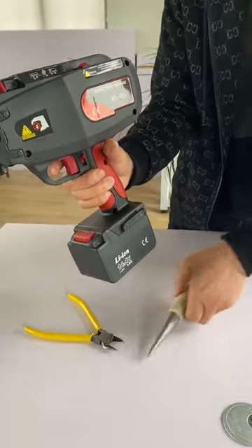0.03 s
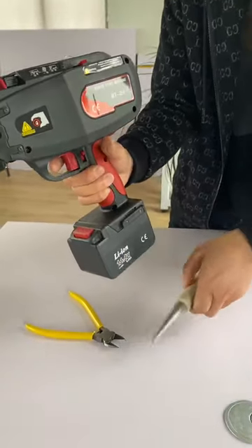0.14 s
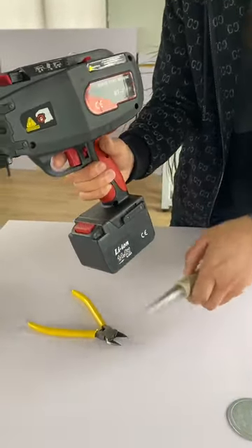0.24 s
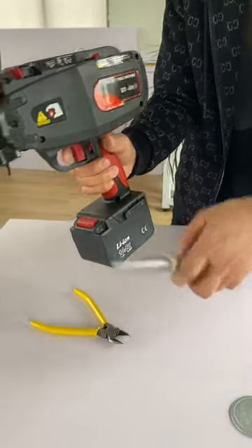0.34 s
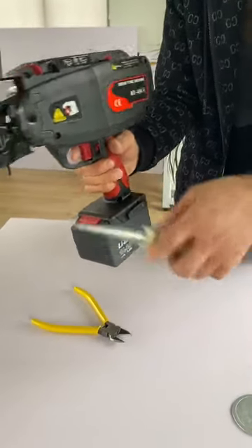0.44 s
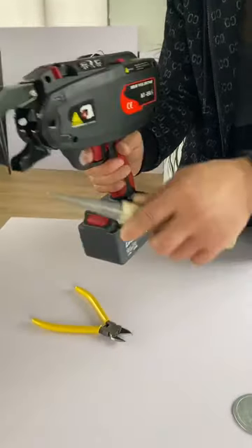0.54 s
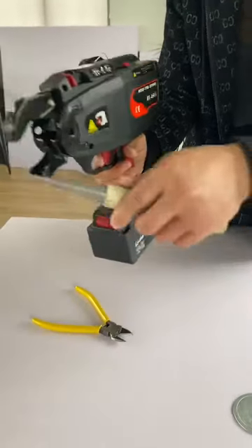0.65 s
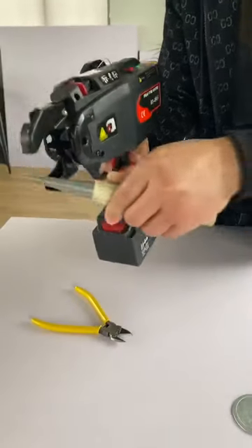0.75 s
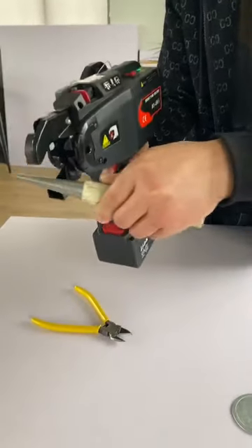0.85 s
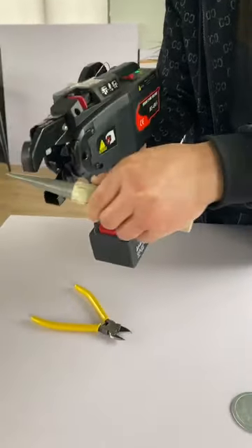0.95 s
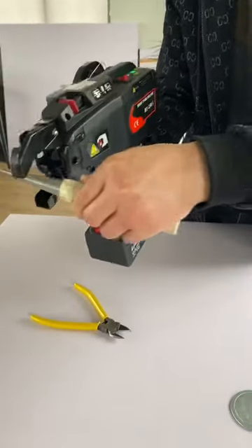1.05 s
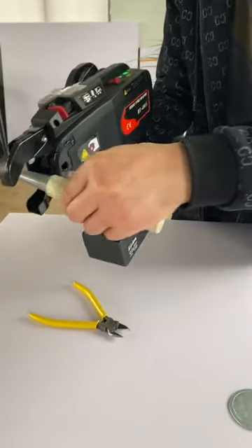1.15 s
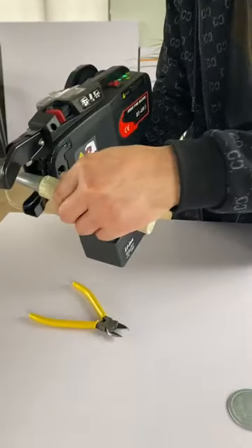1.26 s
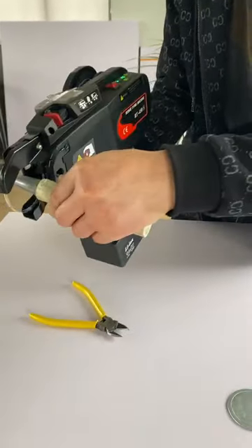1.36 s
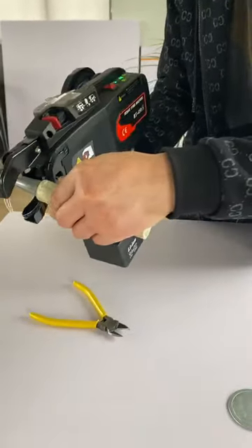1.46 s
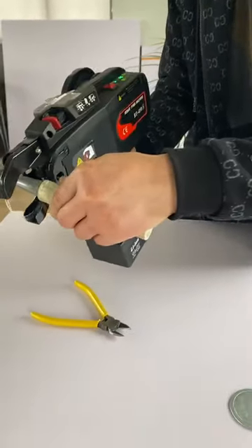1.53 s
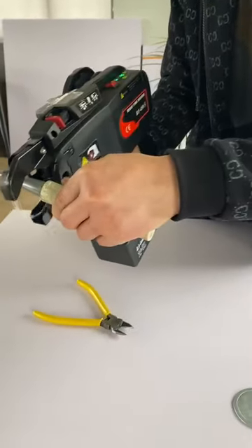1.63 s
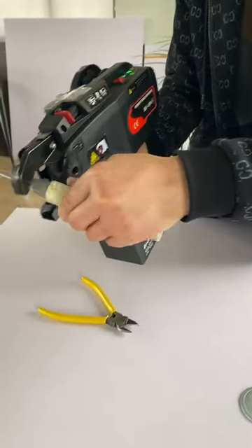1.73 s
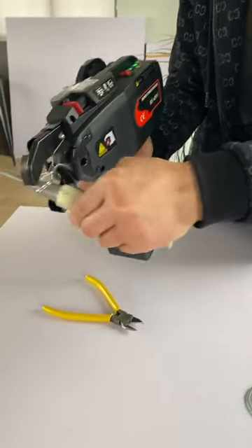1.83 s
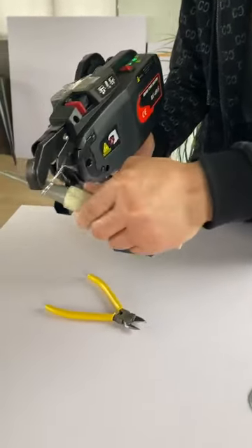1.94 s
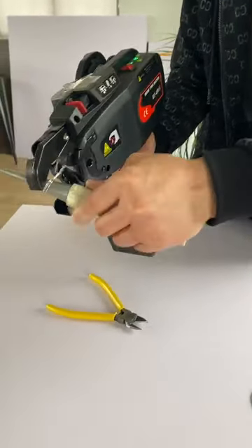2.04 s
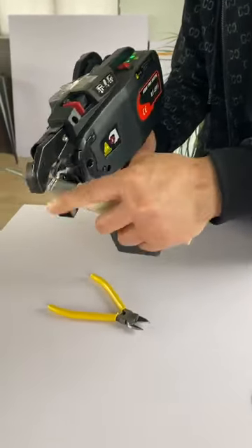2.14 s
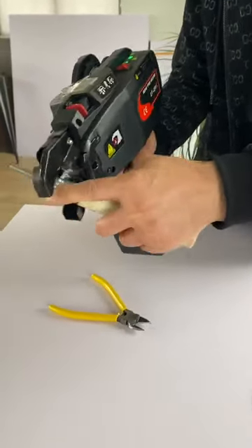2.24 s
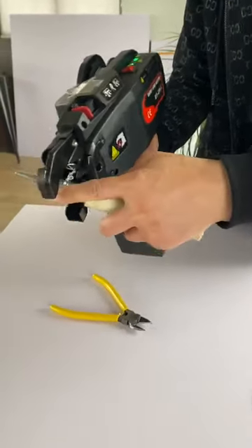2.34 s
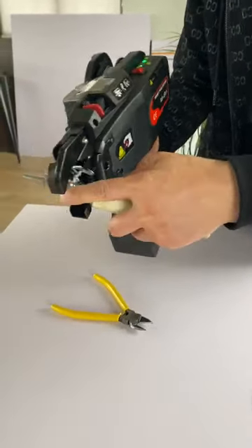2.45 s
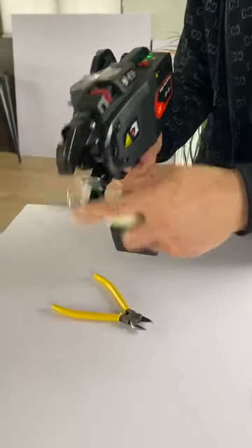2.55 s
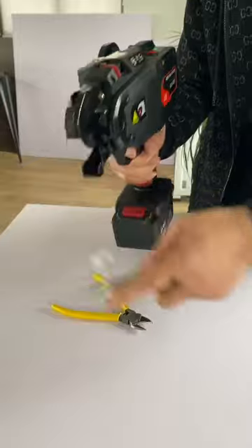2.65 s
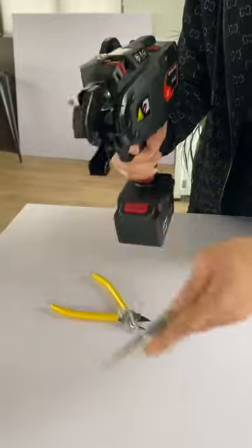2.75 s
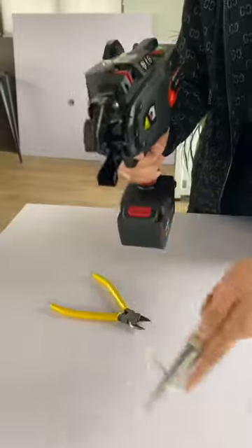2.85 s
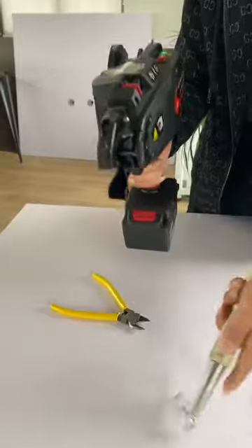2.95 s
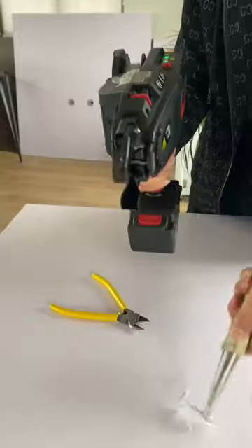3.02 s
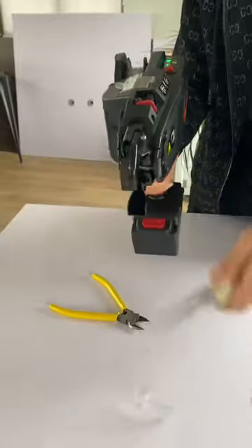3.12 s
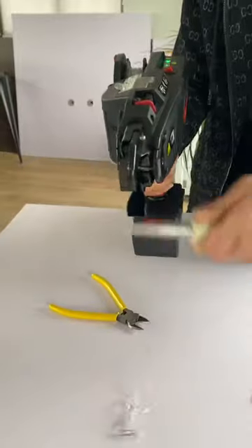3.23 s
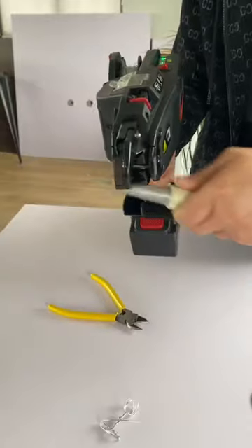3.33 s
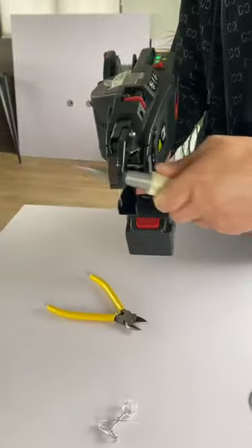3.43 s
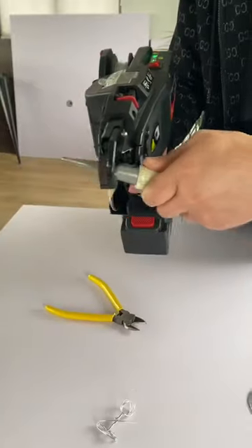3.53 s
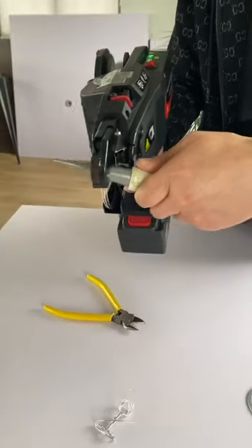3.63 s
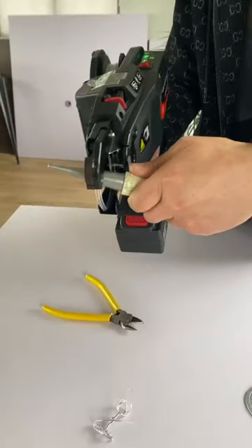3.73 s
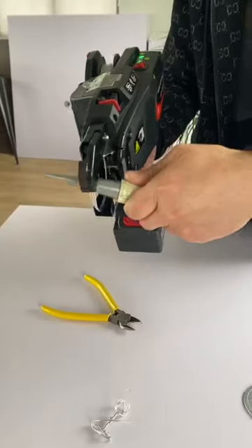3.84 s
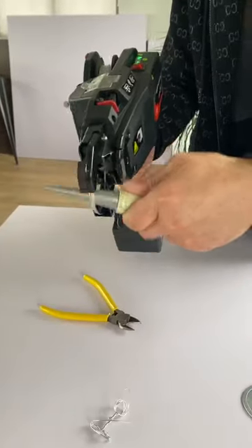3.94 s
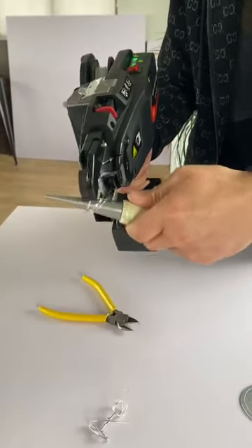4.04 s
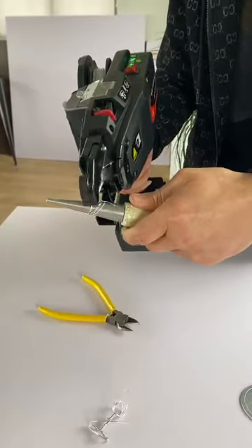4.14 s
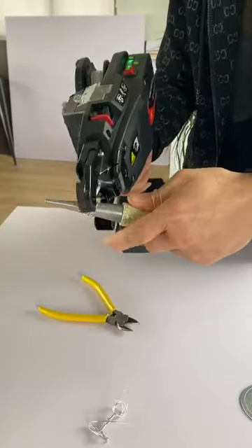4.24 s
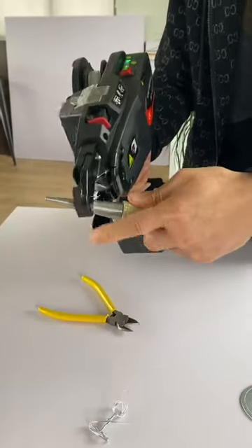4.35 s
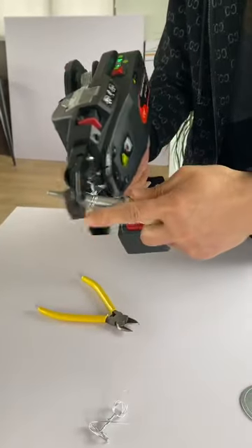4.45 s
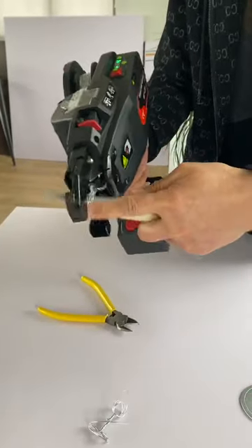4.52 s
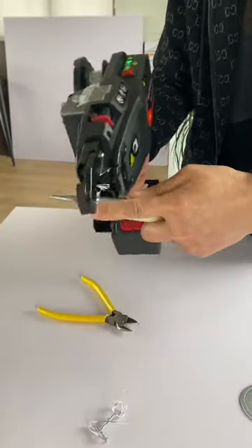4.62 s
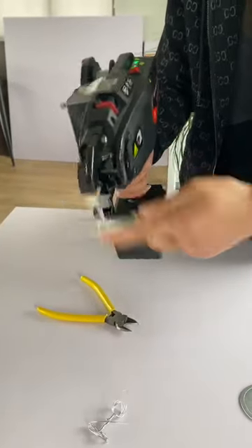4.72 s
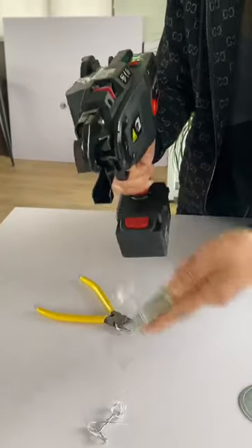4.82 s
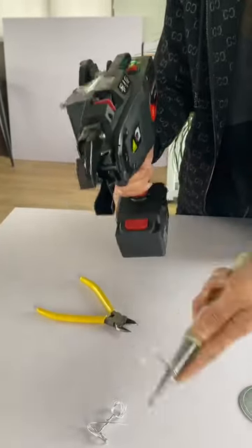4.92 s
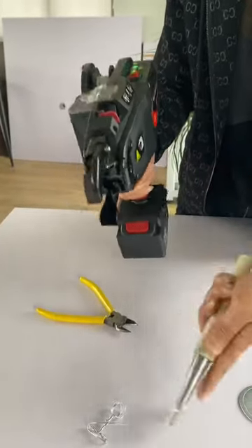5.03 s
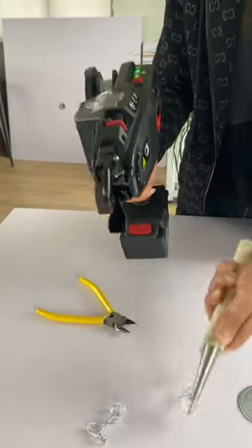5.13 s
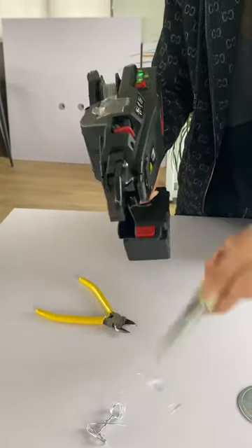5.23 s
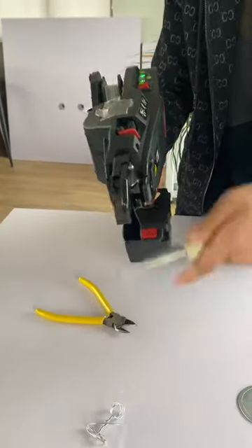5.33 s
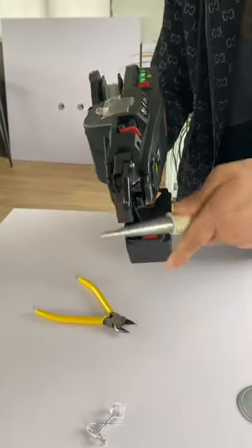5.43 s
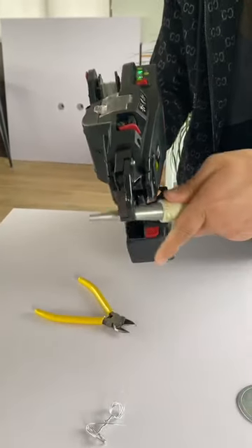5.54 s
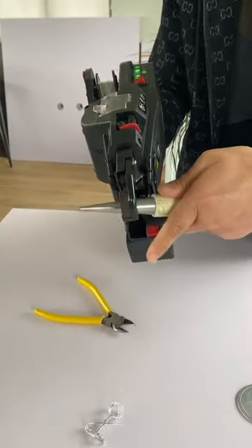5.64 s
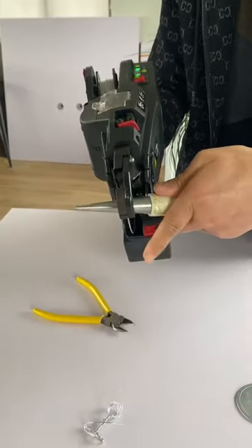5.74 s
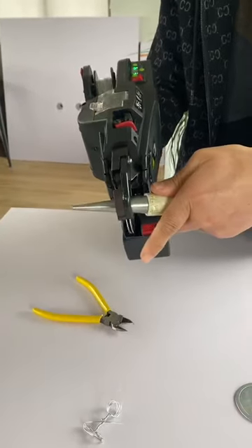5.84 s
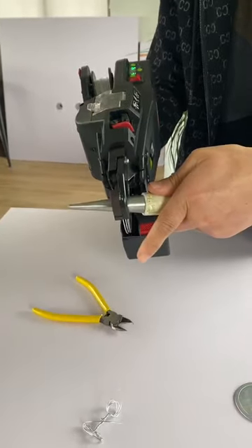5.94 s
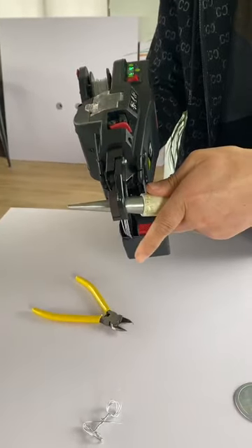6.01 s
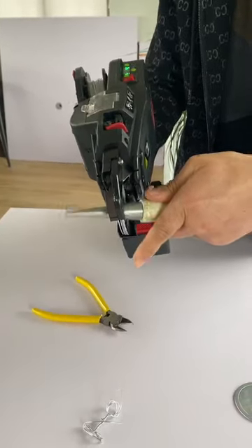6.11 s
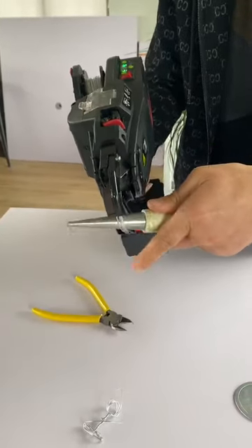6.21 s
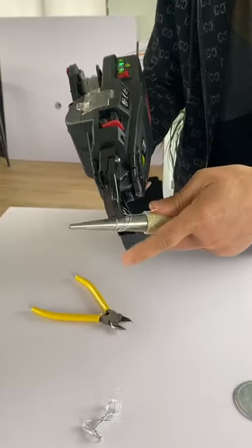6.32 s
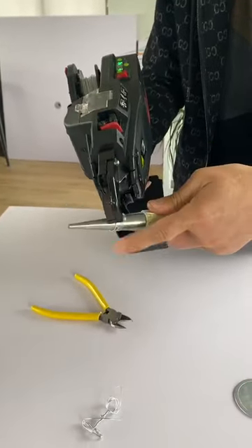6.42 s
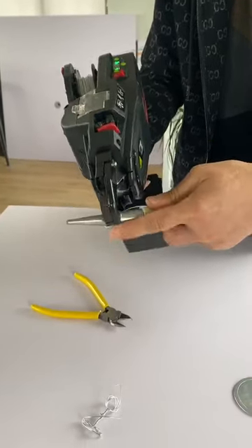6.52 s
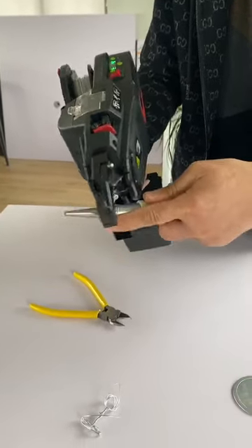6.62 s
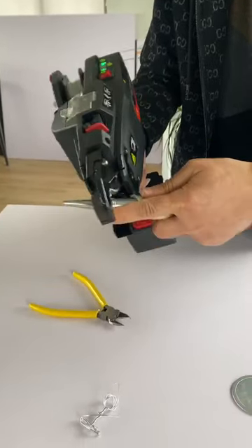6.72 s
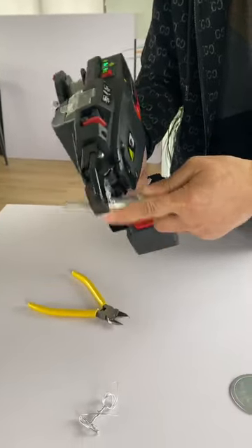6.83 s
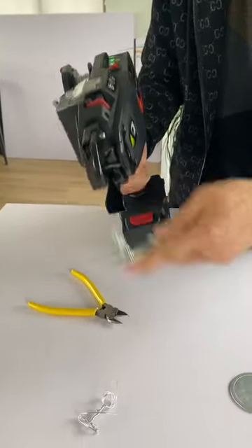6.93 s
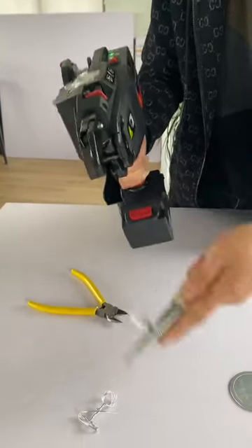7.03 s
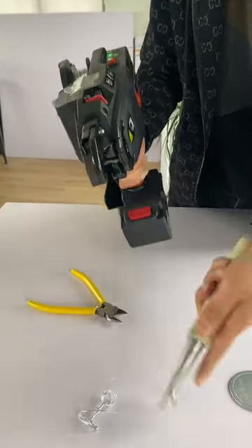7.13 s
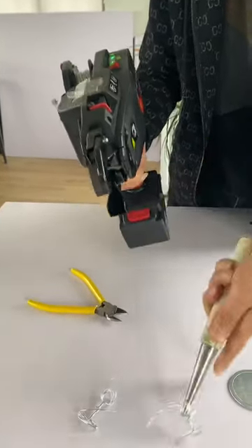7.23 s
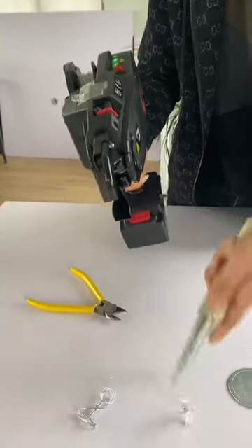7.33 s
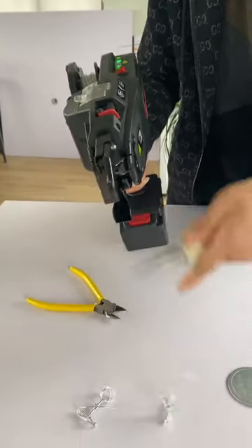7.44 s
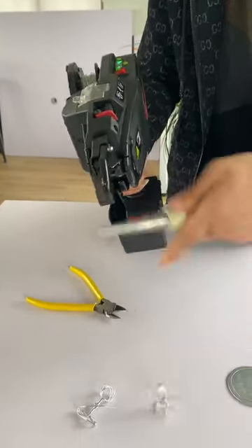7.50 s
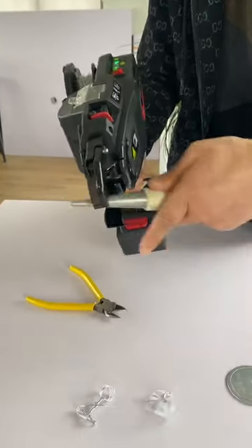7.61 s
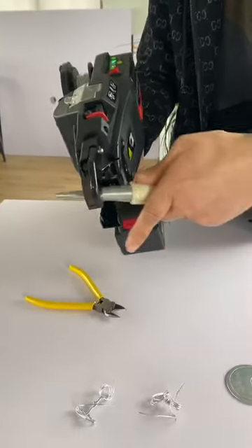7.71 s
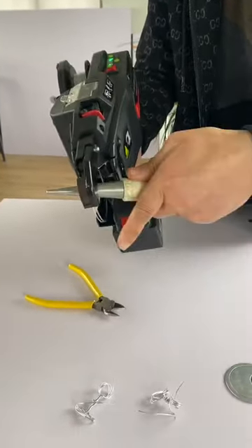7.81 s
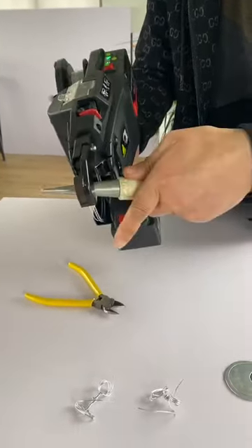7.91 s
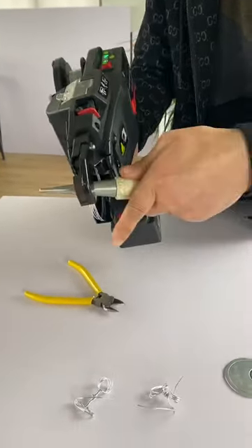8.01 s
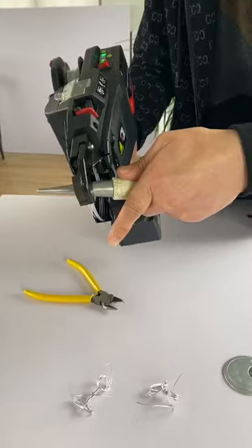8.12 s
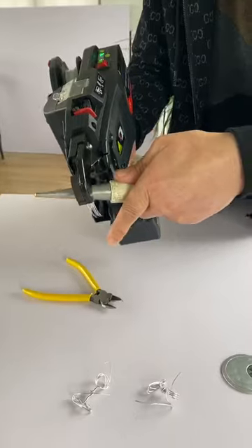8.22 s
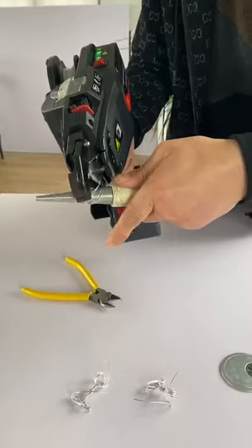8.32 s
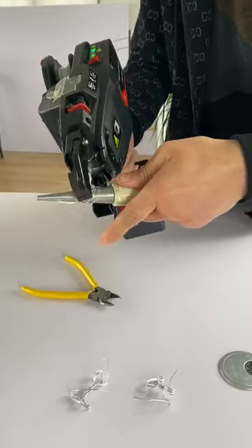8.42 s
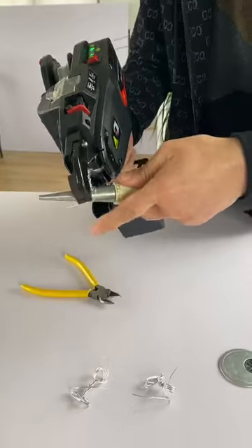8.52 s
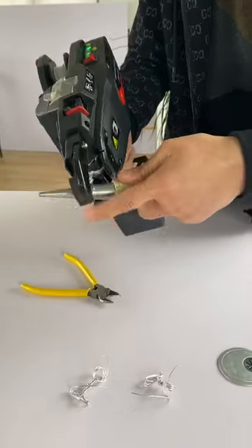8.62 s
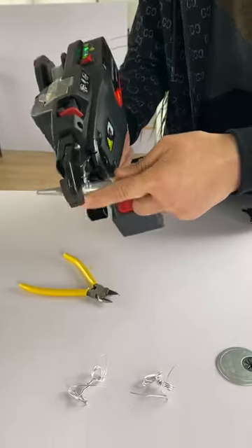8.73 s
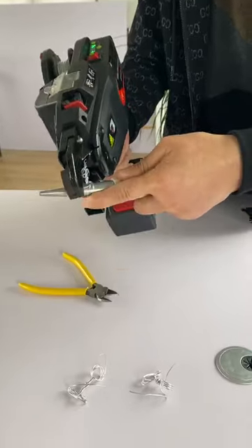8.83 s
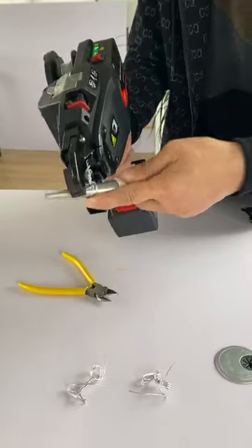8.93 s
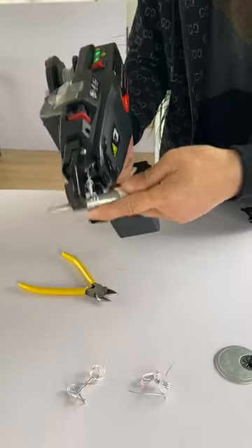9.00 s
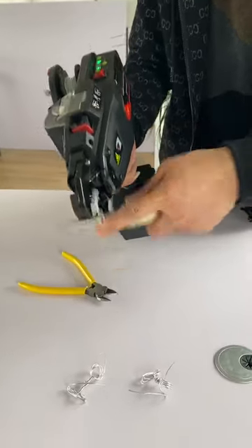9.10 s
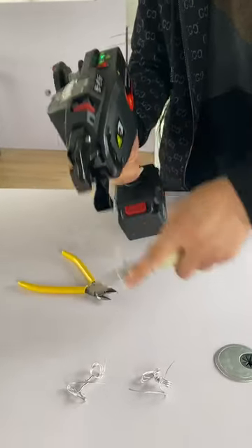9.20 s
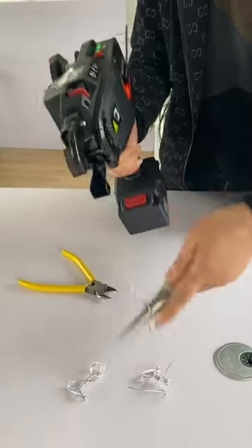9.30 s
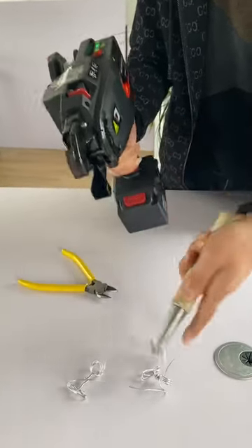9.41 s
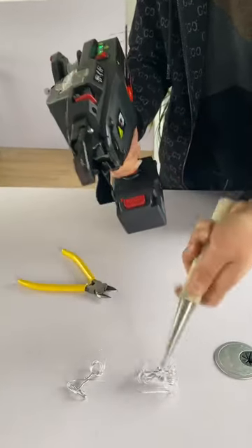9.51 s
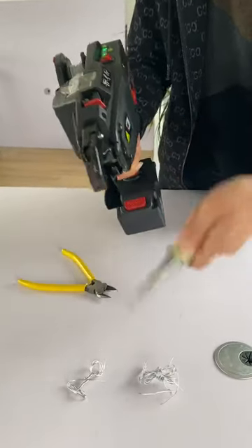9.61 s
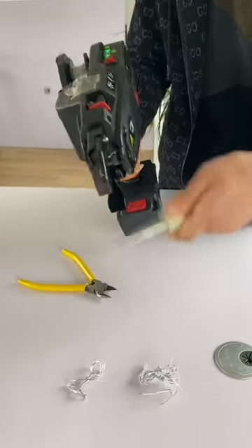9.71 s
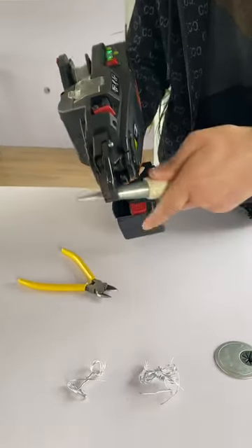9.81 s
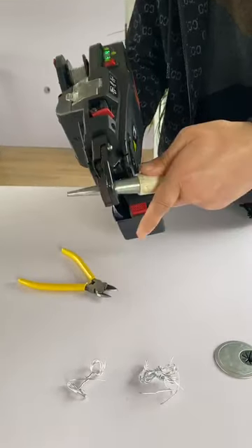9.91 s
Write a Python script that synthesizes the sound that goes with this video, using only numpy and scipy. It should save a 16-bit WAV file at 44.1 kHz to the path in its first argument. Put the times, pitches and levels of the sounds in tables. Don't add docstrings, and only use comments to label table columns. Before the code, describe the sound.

In a bare, echoing workshop, faint scrapes and ticks of steel lead into a battery wire-tying tool. Each cycle rattles as wire feeds, snaps hard at the cutter, clunks at the clutch, then whines and sags while twisting before a softer rewind and clicks. Between cycles, spike and wire knots chink on the table. Four complete ties, then a fifth is cut short. Close phone microphone.

```python
import sys
import numpy as np
from scipy import signal
from scipy.fft import rfft, irfft, next_fast_len
from scipy.io import wavfile
from scipy.ndimage import uniform_filter1d

SR = 44100
rng = np.random.default_rng(int(sys.argv[2]) if len(sys.argv) > 2 else 0)


def volts(x):
    e = np.asarray(x, float) / 20
    return 10 ** e


def transcribe(signal):
    frames = np.atleast_2d(signal).T
    limited = np.clip(frames, -1, 1)
    pcm = np.round(limited * 32767).astype(np.int16)
    wavfile.write(sys.argv[1], SR, pcm)


N = 439236

# (frequency [Hz], density [dB per Hz])
TREBLE = [(4530, -25.5), (7700, -13), (9220, -1), (10500, -1), (11100, -3), (13000, -11)]
# (frequency [Hz], density [dB per Hz])
TWIST_COLOUR = [(150, -61.5), (250, -40.5), (291, -35), (513, -21), (600, -23.5), (705, -13), (810, -15.5),
                (1080, -15.5), (1330, -10.5), (1620, -11.5), (1830, -4.5), (2160, -6), (2450, -4.5),
                (3310, -12), (3970, -12), (5600, -12), (6800, -28), (8840, -62.5), (15000, -120)]


def evened(x):
    return x / np.sqrt(np.mean(x ** 2) + 1e-20)


def read(points, hz):
    f, value = np.transpose(points)
    return np.interp(np.log(hz + 1), np.log(f + 1), value)


def add(mix, s, sound):
    part = mix[round(s * SR):][:len(sound)]
    part += sound[:len(part)]


def coloured(x, points):
    size = next_fast_len(len(x))
    hz = np.fft.rfftfreq(size, 1 / SR)
    inside = (hz > points[0][0]) & (hz < points[-1][0])
    spectrum = rfft(x, size) * volts(read(points, hz)) * inside
    return evened(irfft(spectrum, size)[:len(x)])


def drift(size, hz):
    fast_size = next_fast_len(size)
    low_pass = 1 / (1 + (np.fft.rfftfreq(fast_size, 1 / SR) / hz) ** 4)
    spectrum = rfft(rng.standard_normal(fast_size)) * low_pass
    return evened(irfft(spectrum, fast_size)[:size])


def unpack(rows):
    s, *columns = np.transpose(rows)
    t = np.arange(s[0], s[-1], 1 / SR)
    return [t] + [np.interp(t, s, c) for c in columns]


def rattle(size, spread_db):
    return rng.standard_normal(size) * volts(spread_db * drift(size, 450))


def air():
    # (time [s], rumble level [dB])
    air_levels = [(0.0, -40.5), (0.8, -43.5), (1.36, -39.5), (2.02, -49.5), (2.91, -52.5), (3.16, -46),
                  (3.85, -45.5), (4.6, -51.5), (6.29, -45), (6.82, -52), (7.4, -50), (8.1, -47.5),
                  (8.51, -51), (9.96, -48.5)]
    # (frequency [Hz], density [dB per Hz])
    rumble_colour = [(12, -44), (20, -16.5), (34, -8), (48, 8.5), (75, -2), (102, 4.5), (118, -5),
                     (150, 3.5), (178, -7), (226, -5.5), (300, -27), (390, -56.5), (660, -120)]
    # (frequency [Hz], density [dB per Hz])
    hush_colour = [(150, -22), (250, -6.5), (453, -9.5), (600, -8.5), (652, -9.5), (2840, -26),
                   (7170, -43.5), (10700, -45.5), (13000, -67)]
    # (start [s], end [s], frequency [Hz], level [dB])
    squeak = (.48, .7, 600, -52)
    t, rumble_db = (np.resize(c, N) for c in unpack(air_levels))
    hush_db = -57.5 + 0.84 * (rumble_db + 49.5)
    out = volts(rumble_db + 2.7 * drift(N, 4.2)) * coloured(rng.standard_normal(N), rumble_colour)
    out += volts(hush_db + drift(N, 7.8)) * coloured(rng.standard_normal(N), hush_colour)
    start, end, hz, db = squeak
    t = np.arange(0, end - start, 1 / SR)
    add(out, start, volts(db) * np.sin(2 * np.pi * hz * t) * np.hanning(len(t)))
    return out


def scrape(start, end, db, hz, width, uneven_db=4.5):
    size = round((end - start) * SR)
    slips = rattle(size, uneven_db) * np.linspace(1, .4, size) * signal.windows.tukey(size, .2)
    resonance = [(max(hz - 2 * width, 300), -20), (hz - width / 2, -3), (hz, 0),
                 (hz + width / 2, -3), (hz + 2 * width, -20)]
    return start, volts(db) * coloured(slips, resonance)


def tick(s, peak_db, treble_db, hz, thud_db=-99):
    t = np.arange(2500) / SR
    crack_colour = [(500, -22), (.75 * hz, -11), (hz, 0), (1.25 * hz, -10), (9000, -20), (14000, -30)]
    crack = coloured(rng.standard_normal(len(t)), crack_colour)
    spit = coloured(rng.standard_normal(len(t)), [(6500, -18.5), (10000, 7.5), (12600, 4.5), (14300, -7.0)])
    thud = coloured(rng.standard_normal(len(t)), [(180, -2.0), (350, -1.0), (900, -6.5)])
    snap = volts(peak_db - 6.5) * crack * np.exp(-t / 0.0046)
    snap += volts(treble_db) * spit * np.exp(-t / 0.0028)
    snap += volts(thud_db) * thud * np.exp(-t / 0.013)
    return s - .0015, snap * (1 - np.exp(-(t / 0.0011) ** 2))


def table_top():
    # (start [s], end [s], level [dB], centre [Hz], width [Hz])
    scrapes = [(0, 0.001, -40.5, 5800, 8000), (0, 0.088, -45.5, 583, 284), (0.759, 0.778, -31, 2320, 2520),
               (0.775, 0.973, -59, 3730, 393), (2.995, 3.12, -66, 3480, 900),
               (5.048, 5.08, -55.5, 3120, 3020), (5.056, 5.077, -59, 12000, 2500),
               (5.076, 5.2, -79, 11640, 2500), (5.199, 5.24, -69.5, 11640, 1500),
               (7.381, 7.604, -67, 1295, 480), (9.13, 9.167, -51, 3280, 250),
               (9.147, 9.175, -56, 6270, 200), (9.115, 9.177, -50, 11560, 2200),
               (9.456, 9.463, -40, 1500, 1510), (9.111, 9.175, -52, 5100, 400)]
    # (time [s], peak [dB], treble [dB], centre [Hz])
    ticks = [(0.2732, -42, -66, 2980), (0.7623, -27.5, -23, 2010), (1.1381, -37.5, -50, 1740),
             (2.9256, -23.5, -42.5, 3400), (2.992, -33, -47, 1990), (3.03, -36.5, -44.5, 4060),
             (3.1772, -34, -42.5, 2080), (3.1888, -32, -43, 5500), (3.24, -29.5, -41, 5000),
             (3.371, -46.5, -51.5, 2150), (5.0453, -46, -44.5, 1960), (5.149, -43, -65, 1800),
             (5.3828, -27, -39.5, 5800), (5.4398, -26, -36, 5230), (5.459, -30, -56.5, 3060),
             (5.4996, -40, -39.5, 3410), (5.534, -33.5, -59, 3830), (5.559, -36, -44, 5330),
             (5.586, -35.5, -48, 5140), (5.6243, -35.5, -52, 5440), (7.172, -29, -30.5, 1710),
             (7.2023, -28.5, -36.5, 3650), (7.3488, -38, -47.5, 5040), (7.5034, -44.5, -61, 1620),
             (7.6317, -30.5, -39, 1820), (7.684, -38.5, -50, 2430), (9.1402, -35, -33, 5060),
             (9.166, -29, -42, 3310), (9.456, -27.5, -33.5, 4580), (9.485, -33, -50, 3460)]
    # (time [s], level [dB])
    chinks = [(2.92, -41), (2.935, -55), (2.9742, -46.5), (3.017, -53), (3.037, -50.5), (3.258, -44.5),
              (3.277, -49.5), (5.396, -49.5), (5.591, -45.5), (5.611, -48.5), (5.638, -50), (9.129, -45),
              (9.157, -44), (9.21, -50), (9.5, -52), (9.527, -52)]
    # (start [s], end [s], level [dB], centre [Hz], width [Hz])
    rustles = [
        (2.928, 3.1, -60.5, 3500, 4000),
        (3.171, 3.376, -59, 4000, 4500),
        (5.386, 5.653, -58, 4470, 5000),
        (5.384, 5.65, -64.5, 11500, 2500),
        (7.175, 7.295, -57, 5000, 5000),
        (9.36, 9.45, -75, 10000, 4000),
        (9.47, 9.577, -61.5, 10500, 4000),
    ]
    table = np.zeros(N)
    for row in scrapes:
        add(table, *scrape(*row))
    for s, peak_db, treble_db, hz in ticks:
        add(table, *tick(s, peak_db, treble_db, hz, thud_db=peak_db - 17.5))
    for s, db in chinks:
        add(table, *tick(s, db + 1.5, db, 5800))
    for row in rustles:
        add(table, *scrape(*row, uneven_db=8.))
    return table


def shell(x):
    # (frequency [Hz], width [Hz], gain [dB])
    shell_modes = [(920, 180, 4), (1400, 290, 2), (1850, 57, -1), (2260, 74, -3.5), (2820, 64, -1),
                   (3310, 180, -2.5), (3960, 270, -1), (4320, 210, -2), (5100, 310, 4), (5750, 200, 2)]
    hz, t, z = signal.stft(x, SR, nperseg=1024)
    patches = uniform_filter1d(rng.standard_normal(z.shape), size=4, axis=0)
    patches = evened(uniform_filter1d(patches, size=6, axis=1))
    modes_db = sum(db / (1 + (2 * (hz - f) / w) ** 2) for f, w, db in shell_modes)
    z = z * volts(modes_db[:, None] + 3.5 * patches)
    return evened(np.resize(signal.istft(z, SR, nperseg=1024)[1], len(x)))


def feed(start, closed, db, change_db):
    # (frequency [Hz], density [dB per Hz])
    feed_colour = [(150, -66), (250, -31), (441, -15), (565, -30), (640, -17.5), (917, -11), (1140, -13.5),
                   (1330, -4), (1510, -11), (1830, -8), (2580, -9.5), (2890, -11.5), (3270, -13),
                   (5230, -15), (6800, -27.5), (8840, -56.5), (15000, -120)]
    orders = [14, 20, 27, 28, 29, 39, 40, 42, 46, 60, 84]
    order_levels = [-15, -4, -14, 0, -9, -11, -3, -12, -12, -10, -12]
    shaft_hz, spin_up_s = 46.65, 0.022
    t, body_db = unpack([(start, db - 8.5), (start + spin_up_s, db), (closed, db + change_db)])
    speed = 1 + .035 * np.exp(-(t - t[0]) / .07) + .0008 * drift(len(t), 30)
    turns = np.cumsum(shaft_hz * speed) / SR
    tones = np.zeros(len(t))
    for order, level in zip(orders, order_levels):
        waver = volts(level + 2.2 * drift(len(t), 25))
        tones += waver * np.sin(2 * np.pi * (order * turns + rng.random()))
    knocks = rattle(len(t), 1.0)
    noise = shell(coloured(knocks, feed_colour)) + volts(-11.5) * coloured(knocks, TREBLE)
    return t[0], volts(body_db) * (noise + volts(-3.5) * evened(tones)) * signal.windows.tukey(len(t), .02)


def blow(s, length, peak_db=-99, thump_db=-99, knock_db=-99, treble_db=-99):
    # (frequency [Hz], level [dB], free t60 [s])
    housing = [(437, -10, 0.12), (1110, 8, 0.037), (1470, -8, 0.1), (2344, 0.5, 0.11), (4000, -21.5, 0.095),
               (5196, -15, 0.36), (5300, -32, 0.068), (5430, -42.5, 0.065)]
    t = np.arange(4000) / SR
    shape = (t / length * np.exp(1 - t / length)) ** 2 * volts(3 * drift(len(t), 150))
    shape /= shape.max()
    rings = []
    for hz, db, t60 in housing:
        held_t60 = min(.2 * t60, .02)
        rings.append(volts(db - 60 * t / held_t60) * np.sin(2 * np.pi * hz * t))
    hits = np.diff(rng.standard_normal(len(t)) * shape, prepend=0)
    body = signal.fftconvolve(hits, sum(rings[3:]))[:len(t)]
    knock = signal.fftconvolve(hits, sum(rings[1:3]))[:len(t)]
    body = body / abs(body).max() + 0.42 * coloured(rng.standard_normal(len(t)), TWIST_COLOUR) * shape
    knock = np.roll(knock / abs(knock).max(), 90)
    thump = np.sin(2 * np.pi * housing[0][0] * t) + .3 * np.sin(2 * np.pi * 270 * t)
    thump *= (t / 0.0073 * np.exp(1 - t / 0.0072)) ** 3
    treble = coloured(rng.standard_normal(len(t)), TREBLE) * shape
    out = volts(peak_db) * body + volts(knock_db + 7.5) * knock
    return s - .7 * length, out + volts(thump_db) * thump + volts(treble_db) * treble


def cutter(mix, s, peak_db, thump_db, knock_db, spread):
    # (lag from snap [s], level [dB], treble [dB])
    stages = [
        (-.012, -20.5, -7.5),
        (-.0058, -5, 2),
        (0, -1.5, 1.5),
        (.016, -12.5, -11),
    ]
    length = .0022
    for lag, db, treble_db in stages:
        at = s + (lag if lag > 0 else spread * lag)
        add(mix, *blow(at, length, peak_db + db, knock_db=knock_db + db, treble_db=treble_db - 26))
    add(mix, *blow(s - 0.0027, length, thump_db=thump_db))


def hook_levels(cut, clutch, stop, rest, db, rewind_db):
    reach_db, slack_db, dull_db = -5.5, -3.5, -10.5
    lurch = clutch - 0.042
    steps = [(cut - .004, db - 5, 0),
             (cut + 0.028, db + reach_db, 0),
             (lurch - 0.022, db + reach_db / 2, 0),
             (lurch, db + 3, 0),
             (lurch + 0.008, db + slack_db, 0),
             (clutch - .004, db + slack_db, 0),
             (clutch, db + 6, 0),
             (clutch + 0.013, db, 0),
             (stop - .006, db, 0),
             (stop + 0.024, rewind_db, 0),
             (rest - 0.078, rewind_db, 0),
             (rest - .015, rewind_db - 3, dull_db),
             (rest + .005, rewind_db - 19, dull_db)]
    return [(s, level, dull - 13) for s, level, dull in steps]


def twist(levels, whine, octave_db):
    # (frequency [Hz], density [dB per Hz])
    tooth_ring = [(8300, -18), (9500, -8.5), (10800, 5.5), (11600, -12.5), (13000, -23.5)]
    # (share of mesh rate [1], level [dB])
    idlers = [(.293, -37), (.6, -44)]
    teeth = 16.25
    t, body_db, treble_db = unpack(levels)
    size = len(t)
    s, hz, mesh_db = np.transpose(whine)
    mesh_hz = np.interp(t, s, hz)
    mesh = np.cumsum(mesh_hz * (1 + .0008 * drift(size, 60))) / SR
    on = np.clip(np.minimum(t - s[0], s[-1] - t) / 0.0053, 0, 1)

    turn = mesh / teeth
    size_db = np.resize(rng.normal(0, 1.5, 8), 400) + rng.normal(0, 1.5, 400)
    tooth = on * volts(size_db[turn.astype(int)]) * np.exp(-(turn % 1) / .16)
    knocks = rattle(size, 2.01) * volts(1.5 * drift(size, 30))
    treble = coloured(knocks * (1 + 0.51 * tooth), TREBLE)
    treble += volts(9) * coloured(knocks, tooth_ring) * uniform_filter1d(tooth, size=30)
    noise = shell(coloured(knocks * (1 + 0.19 * tooth), TWIST_COLOUR)) + volts(treble_db) * treble

    shake = (1 + .22 * np.cos(2 * np.pi * turn)) * volts(2.2 * drift(size, 45))
    tone = np.sin(2 * np.pi * mesh) * shake * volts(np.interp(t, s, mesh_db))
    fast = np.clip((mesh_hz - 2020) / 300, 0, 1)
    held = np.minimum.accumulate(np.clip((mesh_hz - 1930) / 250, 0, 1))
    octave = np.sin(4 * np.pi * mesh) * volts(octave_db + 1.8 * drift(size, 40))
    tone += np.maximum(held, .4 * fast) * octave
    for share, db in idlers:
        level = fast * volts(db + 2.0 * drift(size, 40))
        tone += level * np.sin(2 * np.pi * share * mesh + 1.0 * drift(size, 40))
    return t[0], (volts(body_db) * noise + np.sqrt(2) * on * tone) * signal.windows.tukey(size, .02)


def tool_sounds():
    # (trigger [s], feed end [s], gear rattle [dB], change by the end [dB])
    feeds = [
        (1.185, 1.595, -24.5, -1),
        (3.421, 3.841, -29, -1),
        (5.656, 6.062, -29.5, -1),
        (7.695, 8.109, -30, -0.5),
        (9.892, 9.963, -28.5, -3.5),
    ]
    # (time [s], peak [dB], housing thump [dB], knock [dB], spread of the stages [0-1])
    cuts = [
        (1.588, -7.5, -21, -7.5, .9),
        (3.8305, -8, -17, -11.5, .95),
        (6.0606, -10, -18, -12, .3),
        (8.108, -7.5, -19, -12, .9),
    ]
    # (clutch [s], stop [s], rest [s], twisting [dB], rewinding [dB])
    twists = [
        (1.758, 2.292, 2.568, -23, -32.5),
        (3.994, 4.452, 4.735, -21.5, -33),
        (6.231, 6.735, 7.01, -21.5, -34),
        (8.262, 8.688, 8.93, -22, -30.5),
    ]
    # (time [s], mesh rate [Hz], mesh level [dB])
    whines = [
        [(1.785, 2486, -26), (1.86, 2470, -22), (2.014, 2337, -21.5), (2.085, 2111, -25), (2.115, 1838, -28),
         (2.17, 1920, -30), (2.228, 1798, -24.5), (2.29, 2380, -20), (2.302, 2416, -34.5)],
        [(4.03, 2477, -31.5), (4.09, 2425, -24), (4.241, 2343, -22.5), (4.3, 2082, -28.5), (4.345, 1885, -24.5),
         (4.38, 1825, -15.5), (4.403, 1975, -36.5), (4.43, 1850, -15), (4.468, 1736, -29.5)],
        [(6.245, 2450, -31.5), (6.41, 2392, -25), (6.47, 2348, -21.5), (6.53, 2050, -27.5), (6.61, 1965, -24),
         (6.636, 1940, -24), (6.672, 1800, -17), (6.715, 1880, -35), (6.745, 1720, -12)],
        [(8.29, 2460, -29), (8.36, 2432, -23.5), (8.462, 2370, -26), (8.516, 2215, -24), (8.58, 1898, -25),
         (8.612, 1834, -16.5), (8.644, 1960, -27.5), (8.675, 1815, -16.5), (8.688, 1710, -31)],
    ]
    octaves = [-28.5, -30.5, -32.5, -35]
    # (level over the rewind rattle [dB], centre [Hz], width [Hz])
    groan = (-6.5, 1940, 800)
    # (time [s], level [dB])
    pawls = [(1.726, -26), (2.435, -29.5), (2.454, -35), (2.5797, -43), (2.5962, -38), (2.6366, -45),
             (2.663, -49.5), (3.92, -30.5), (3.96, -20.5), (4.5751, -32), (4.616, -34), (4.6589, -37.5),
             (4.725, -41), (4.7397, -34), (6.193, -29.5), (6.843, -36), (6.8606, -31), (6.875, -35.5),
             (6.9025, -34), (8.2295, -26)]
    # (time [s], peak [dB], knock [dB], treble [dB], length [ms])
    blows = [(1.7564, -11, -25.5, -25, 2.7), (1.7636, -16, -32, -32, 2), (1.7726, -16.5, -32, -31, 2),
             (1.8329, -10.5, -19, -36, 1.5), (2.447, -23.5, -28, -36, 1.8), (2.4637, -20, -24, -22.5, 1.5),
             (3.991, -19, -24, -32, 5), (4.069, -22, -21.5, -44, 2), (4.623, -19, -20.5, -23, 1.5),
             (6.1435, -20, -31.5, -25, 1.5), (6.159, -26, -24, -37.5, 3), (6.229, -14.5, -26.5, -23.5, 2.5),
             (6.305, -20.5, -20, -40, 2.2), (8.218, -24.5, -46.5, -39.5, 4),
             (8.253, -24.5, -31.5, -30.5, 3.5), (8.347, -23.5, -19.5, -41, 1.7),
             (8.8364, -17, -22.5, -21.5, 1.5)]
    tool = np.zeros(N)
    for row in feeds:
        add(tool, *feed(*row))
    for row in cuts:
        cutter(tool, *row)
    for cut, row, whine, octave_db in zip(cuts, twists, whines, octaves):
        clutch, stop, rest, twist_db, rewind_db = row
        add(tool, *twist(hook_levels(cut[0], *row), whine, octave_db))
        add(tool, *scrape(clutch, stop, rewind_db + groan[0], *groan[1:], uneven_db=3.0))
    for s, db in pawls:
        add(tool, *tick(s, db - 2, db, 5200))
    for s, peak_db, knock_db, treble_db, ms in blows:
        add(tool, *blow(s, ms / 1000, peak_db, knock_db=knock_db, treble_db=treble_db))
    return tool


def room(x):
    # (frequency [Hz], t60 [s])
    decay_times = [(300, 0.35), (700, 0.93), (1500, 0.55), (4000, 0.81), (10000, 0.47)]
    taps = rng.standard_normal(SR) * (np.arange(SR) > 250)
    hz, t, z = signal.stft(taps, SR, nperseg=256)
    decay_db = -60 * t / read(decay_times, hz)[:, None]
    tail = signal.istft(z * volts(decay_db), SR, nperseg=256)[1]
    return signal.fftconvolve(x, tail / np.linalg.norm(tail))[:N]


def scene():
    table, tool = table_top(), tool_sounds()
    echo = room(volts(-10) * tool + volts(-9) * table)
    return (tool + table + echo + air())[None]


def top_cut(x):
    return signal.sosfilt(signal.butter(12, 14280, fs=SR, output="sos"), x)


def record(dry):
    # (low edge [Hz], high edge [Hz])
    gaps = [(6900, 7620), (13150, 13800)]
    # (frequency [Hz], level [dB])
    audible = [(5000, -125), (6600, -99), (7900, -99), (9000, -112), (11500, -110), (13000, -103),
               (13800, -77.5), (14300, -78.5)]
    hz, t, z = signal.stft(0.78 * np.tanh(dry[0] / 0.81), SR, nperseg=1024, noverlap=768)
    power = uniform_filter1d(abs(z) ** 2, size=9, axis=1) + 1e-16
    high_db = 10 * np.log10((abs(z[hz > 8000]) ** 2).sum(0) + 1e-14)
    rise = high_db - np.roll(high_db, 2) > 8
    steady = ~(rise | np.roll(rise, -1))

    low_hz = hz[:512]
    band_db = np.repeat(10 * np.log10(power[:512].reshape(128, 4, -1).mean(1)), 4, axis=0)
    mask_db = uniform_filter1d(band_db, size=36, axis=0) - 3.2
    masked = (band_db < mask_db) & ((low_hz > 2700) & (low_hz < 4800))[:, None]
    faint = (band_db < read(audible, low_hz)[:, None]) & (low_hz > 5000)[:, None]
    z[:512][faint & steady] = 0
    z[:512][masked & steady] *= .07
    for low, high in gaps:
        z[(hz > low) & (hz < high)] *= np.where(steady, 0, volts(-16.0))

    top = np.flatnonzero((hz >= gaps[1][1]) & (hz < 14260))
    waver_db = 3.5 * evened(uniform_filter1d(rng.standard_normal(len(t)), size=12))
    loud = uniform_filter1d(high_db, size=7) + waver_db > -39.5
    z[top] += z[top - 60] * volts(-5) * loud * np.hanning(len(top) + 2)[1:-1, None] ** 2
    z[hz >= 14300] = 0
    mix = signal.istft(z, SR, nperseg=1024, noverlap=768)[1][None, :N]
    return top_cut(mix)


dry = scene()
out = record(dry)
transcribe(out)
```